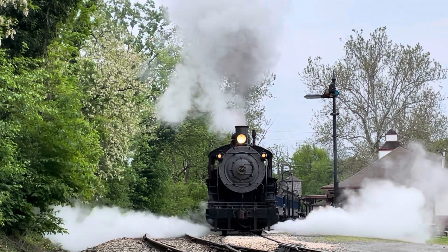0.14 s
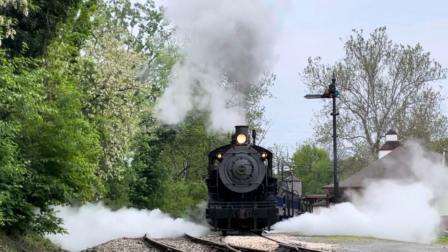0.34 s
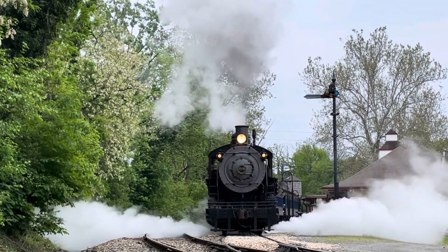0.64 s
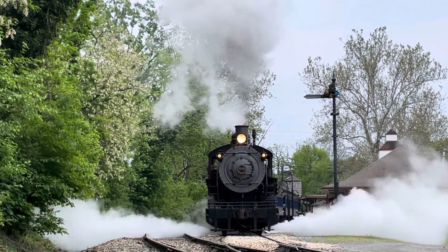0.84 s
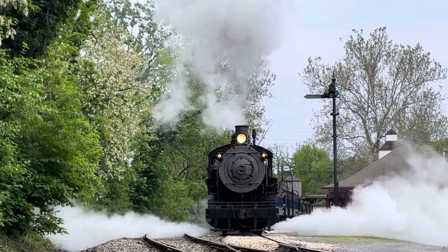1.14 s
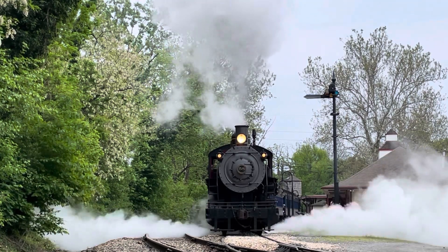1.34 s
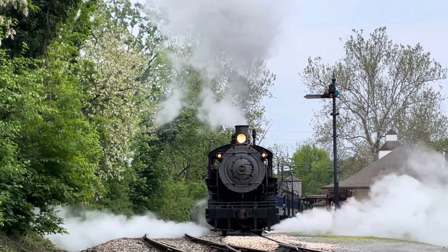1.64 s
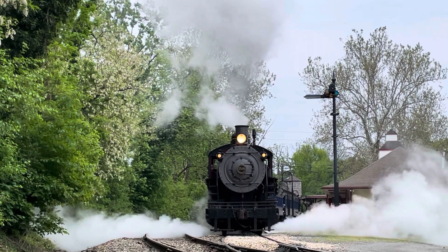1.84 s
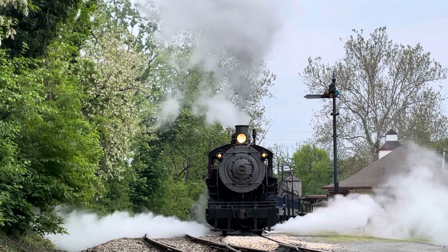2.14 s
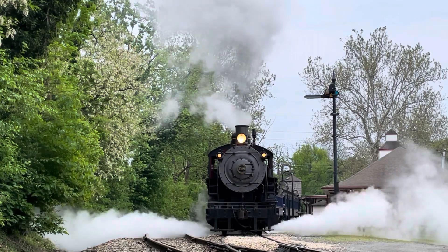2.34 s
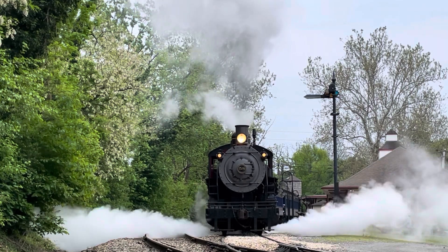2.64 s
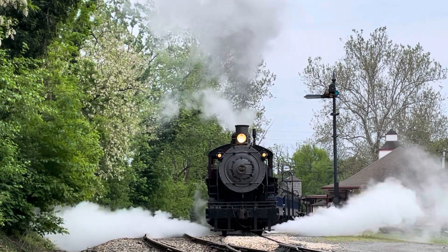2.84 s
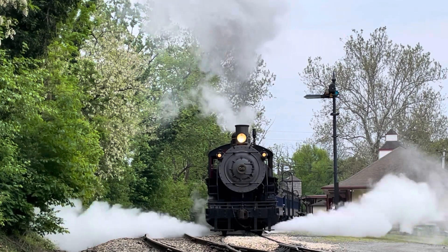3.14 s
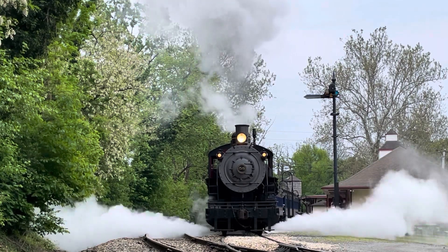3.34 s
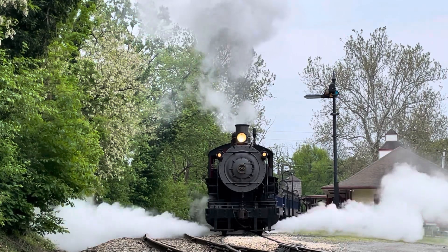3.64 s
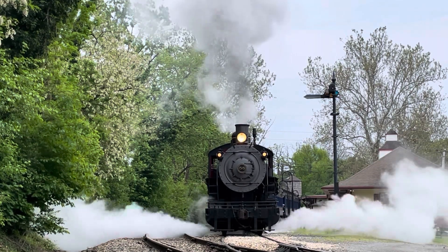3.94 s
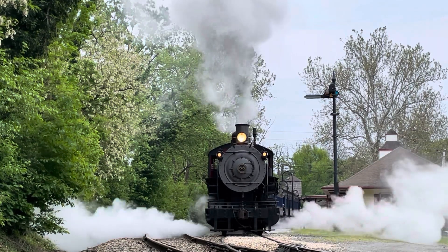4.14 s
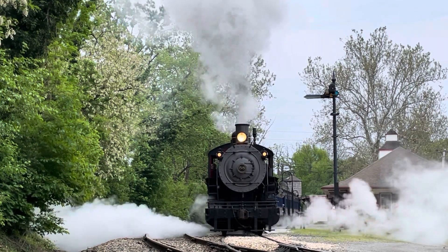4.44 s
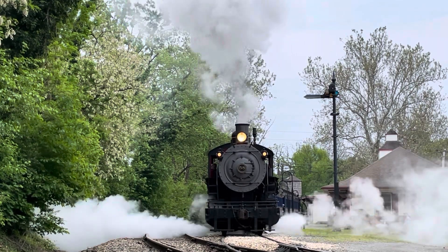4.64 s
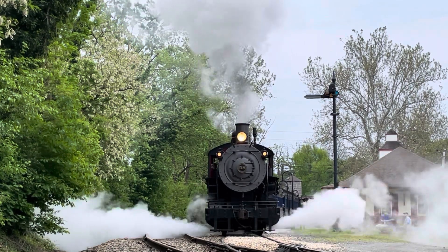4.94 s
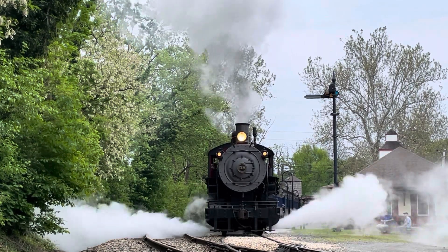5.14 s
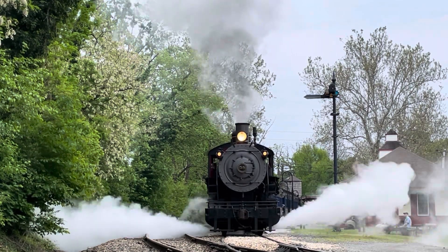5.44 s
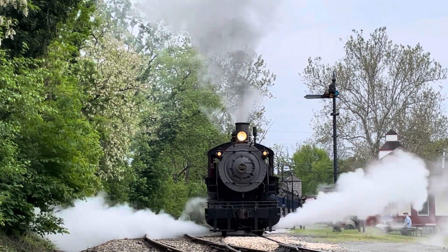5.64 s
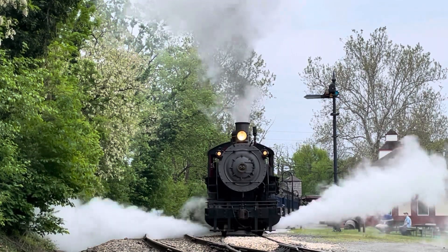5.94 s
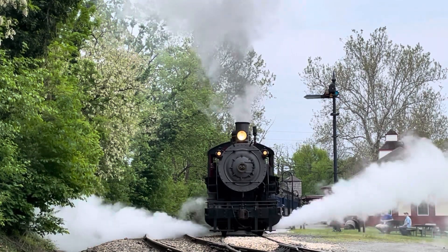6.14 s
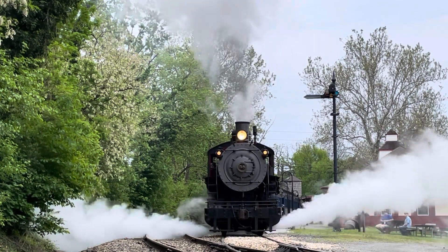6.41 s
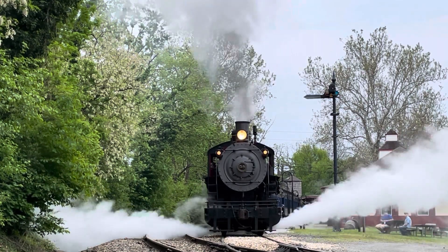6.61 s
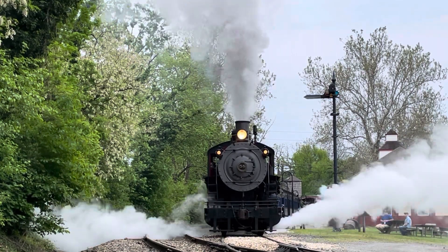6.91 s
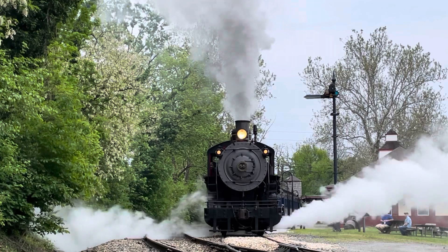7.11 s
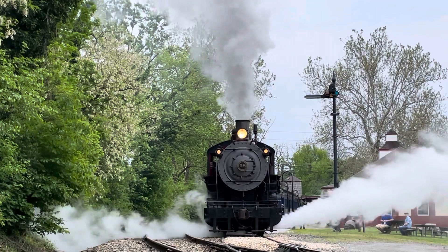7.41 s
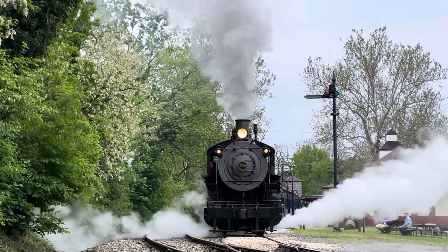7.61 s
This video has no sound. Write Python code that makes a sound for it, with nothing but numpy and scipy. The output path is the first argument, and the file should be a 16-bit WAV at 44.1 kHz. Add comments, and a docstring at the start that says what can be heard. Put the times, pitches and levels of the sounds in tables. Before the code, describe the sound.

A steam locomotive stands outdoors some way off, venting steam. A full hiss swells at once, sinks to a weaker breathy rush, then surges back louder and holds for several seconds before easing into a thinner, sharper spray. Beneath it lie a dull low rush and an uneven stack rumble, with barely noticeable wavering tones and a late low hum. Close stereo microphone pair, open air, no obvious echo.

```python
"""Steam hisses in swelling jets from the cylinder cocks of a locomotive standing some way off; under it the
draught rumbles in the stack, a low hum joins later and a few faint tones waver.
The jets are noise coloured by a pressure curve and by random eddies, the rumble and a dull low rush of
steam are steady noise with moving levels, and the tones are noise through narrow resonances.
The phase between left and right turns with frequency, as in a close pair, then in half-turn steps."""
import sys
import numpy as np
from scipy import signal
from scipy.fft import rfft, irfft, next_fast_len
from scipy.io import wavfile
from scipy.ndimage import uniform_filter1d

SR = 44100
rng = np.random.default_rng(int(sys.argv[2]) if len(sys.argv) > 2 else 0)


def transcribe(signal):
    """Save signal, clipped to [-1, 1], as a 16-bit WAV file at the path in sys.argv[1]."""
    frames = np.atleast_2d(signal).T
    limited = np.clip(frames, -1, 1)
    pcm = np.round(limited * 32767).astype(np.int16)
    wavfile.write(sys.argv[1], SR, pcm)


N = 342657
FRAME, HOP = 2048, 256   # short-time spectrum, samples

# Corners in Hz between the roar, throat, hiss and sizzle bands of the jets.
ROAR_HZ, THROAT_HZ, SIZZLE_HZ = 1770, 2760, 7160
# Share of the pressure swing that each band follows; the hiss between throat and sizzle follows it all.
ROAR_FOLLOWS, THROAT_FOLLOWS, SIZZLE_FOLLOWS = 0.45, 0.5, 1.28
# The resonances flatten as the jets thin, down to the share left.
PEAKS_FADE_FROM_S, PEAKS_FADE_S, PEAKS_LEFT = 4.2, 1.0, 0.3
# Spectral density of the steam noise. Each row: frequency in Hz, relative density in dB per Hz.
STEAM_SPECTRUM = [(700, -37), (900, -13.5), (1150, -10.5), (1350, -4), (2000, -3.5), (3000, -1), (4500, -1),
                  (5400, 0), (7000, -1.5), (9300, -4.5), (11500, -12.5), (13800, -18.5), (15700, -16)]
# Resonances and a dip in the jets. Each row: centre in Hz, full width at 1/e of the dB value in Hz,
# height in dB before flattening.
JET_RESONANCES = [(1297, 55, 5), (1570, 120, -3), (1685, 70, 3), (1890, 80, 2), (5215, 300, 2)]
# Change of colour as the jets thin and brighten. Each row: time in seconds, then roar, throat and
# sizzle offsets in dB.
JET_BRIGHTENING = [(0, 2, 2, -1), (.4, 1.5, 2, -2), (1.0, 2, 2.5, -2.5), (2.3, 1, 1, -1.5),
                   (3.3, -0.1, 2.6, -1.5), (4.0, -2, 1, 0), (5.0, -1.5, -0.5, -2.5), (6.2, -1.5, -1, 4),
                   (7.0, -7, -4, 4), (7.77, -7, -9.5, 0.5)]


def jets():
    """Turbulent jet noise: pressure sets level and colour, and eddies modulate the spectrum at random."""
    def gain_db(hz, s):
        mean_db, swing_db = pressure_swing_db(s)
        roar_db, throat_db, sizzle_db = columns(JET_BRIGHTENING, s)
        roar = 1 - above(hz, ROAR_HZ, 6.2)
        throat = 1 - above(hz, THROAT_HZ, 3.9) - roar
        sizzle = above(hz, SIZZLE_HZ, 4.1)
        # each band departs from the full swing by its own share
        colour_db = roar * (roar_db + (ROAR_FOLLOWS - 1) * swing_db)
        colour_db = colour_db + throat * (throat_db + (THROAT_FOLLOWS - 1) * swing_db)
        colour_db = colour_db + sizzle * (sizzle_db + (SIZZLE_FOLLOWS - 1) * swing_db)

        peaks_db = sum(db * np.exp(-(2 * (hz - centre) / width) ** 2)
                       for centre, width, db in JET_RESONANCES)
        fade_times = [PEAKS_FADE_FROM_S, PEAKS_FADE_FROM_S + PEAKS_FADE_S]
        peaks_db = peaks_db * np.interp(s, fade_times, [1, PEAKS_LEFT])

        shape = (len(hz), len(s))
        sputter = eddies((1, len(s)), frames=3, bins=1)    # the whole jet at once
        surges = eddies(shape, frames=24, bins=40)         # slow swells, band by band
        gusts = eddies(shape, frames=3, bins=70)           # quick, in broad bands
        unevenness = eddies(shape, frames=12, bins=2)      # brief narrow-band unevenness of the hiss
        # weights are rms depths in dB; the gusts reach only the treble
        flutter_db = 0.15 * sputter + 0.38 * surges + 1.0 * sizzle * gusts + 2.59 * unevenness

        steam_db = at_hz(STEAM_SPECTRUM, hz)
        level_db = mean_db + swing_db - hiss_band_db(hz, steam_db)
        return steam_db + peaks_db + level_db + colour_db + flutter_db
    return shaped_noise(gain_db)


# Steam pressure, as the level of the hiss band. Each row: time in seconds, level in dB.
STEAM_PRESSURE = [(0, -31), (.2, -24), (.33, -23), (.45, -23.5), (.78, -30.5), (1.06, -30.5), (1.35, -34.5),
                  (1.7, -31.5), (2.0, -28.5), (2.09, -29.5), (2.2, -24), (2.38, -21.5), (2.46, -23),
                  (2.75, -22), (2.85, -23.5), (3.14, -22), (3.5, -23.5), (3.76, -25), (4.3, -24),
                  (4.67, -25), (4.8, -22), (5.3, -24.5), (5.39, -23), (5.84, -22.5), (6.05, -24),
                  (6.4, -28), (6.66, -26.5), (7.42, -26.5), (7.77, -27.5)]


def pressure_swing_db(times):
    """Pressure modulation: the mean hiss level, and the swing about it."""
    hiss_db, = columns(STEAM_PRESSURE, times)
    return hiss_db.mean(), hiss_db - hiss_db.mean()


def hiss_band_db(hz, colour_db):
    """Band level by power summation: what unit noise of this colour has in the hiss band."""
    in_band = (hz > THROAT_HZ) * (hz < SIZZLE_HZ)
    return 10 * np.log10(np.mean(from_db(2 * colour_db) * in_band))


# Spectra of the draught's rumble and the steam's dull low rush. Each row: frequency in Hz, relative
# density in dB per Hz.
RUMBLE_SPECTRUM = [(12, -45), (20, -27), (42, -8), (65, 0.5), (140, -8.5), (160, -10), (210, -42),
                   (350, -120)]
LOW_RUSH_SPECTRUM = [(80, -27), (130, -7.5), (185, -3.5), (255, -3), (360, -8.5), (500, -6), (740, -3),
                     (950, -4.5), (1300, -54)]
# Their levels; the rumble's level wanders unevenly. Each row: time in seconds, level in dB.
RUMBLE_LEVEL = [(0.0, -54), (0.21, -51.5), (1.77, -52), (1.82, -48.5), (2.08, -55), (2.12, -48.5),
                (3.29, -53.5), (3.35, -43), (3.48, -53.5), (4.05, -44), (4.2, -54), (4.67, -55),
                (4.7, -48.5), (5.0, -55), (6.49, -58.5), (6.79, -50.5), (6.9, -59), (7.77, -55)]
LOW_RUSH_LEVEL = [(0.0, -52), (0.3, -45), (1.19, -52.5), (2.6, -45), (3.55, -49.5), (3.98, -48), (4.0, -50),
                  (5.93, -48), (6.28, -51), (7.77, -50)]


def rumble_and_low_rush():
    """Flow noise with moving levels: the draught rumbling in the stack and a dull low rush of the steam."""
    s = np.arange(N) / SR
    rumble_db, = columns(RUMBLE_LEVEL, s)
    low_rush_db, = columns(LOW_RUSH_LEVEL, s)
    rumble = from_db(rumble_db) * coloured(RUMBLE_SPECTRUM)
    low_rush = from_db(low_rush_db) * coloured(LOW_RUSH_SPECTRUM)
    return rumble + low_rush


HOLD_FADE_S = 0.053   # each fade is centred on the start or end of a hold
# Faint tones and the late hum. Each row: start in seconds, length in seconds, frequency in Hz,
# resonance width in Hz, level in dB.
HELD_TONES = [(.2, 2.5, 744, 10, -60), (2.7, 1.4, 738, 8, -56.5), (.97, .3, 938, 3, -52),
              (1.6, .3, 938, 3, -57), (1.97, .3, 940, 3, -52), (3.68, .14, 938, 3, -52),
              (1.0, .25, 4060, 12, -45), (4.68, .6, 192, 22, -58), (5.42, 1.1, 184, 14, -55),
              (6.7, 1.07, 192, 20, -57.5)]


def tones():
    """Narrow-band noise: faint wavering tones, each faded in, held and faded out."""
    s, out = np.arange(N) / SR, 0
    for start, length, hz, width_hz, db in HELD_TONES:
        to_nearest_end = np.minimum(s - start, start + length - s)
        held = np.clip(to_nearest_end / HOLD_FADE_S + 0.5, 0, 1)
        tone = np.array([rms_one(held * field) for field in resonance(hz, width_hz)])
        # the level holds while the tone sounds, so its share of the whole time is restored
        out = out + from_db(db) * np.sqrt(np.mean(held ** 2)) * tone
    return out


def resonance(hz, width_hz):
    """Resonant filtering: noise twice through a two-pole resonator gives a wavering tone of unit rms."""
    radius = np.exp(-np.pi * width_hz / SR)
    poles = [1, -2 * radius * np.cos(2 * np.pi * hz / SR), radius * radius]
    x = rng.standard_normal((2, N + SR))   # a second extra to settle
    for _ in range(2):
        x = signal.lfilter([1, 0, -1], poles, x)
    return rms_one(x[:, SR:])


RIGHT_BASS_DB, BASS_HZ = 0.35, 2010   # below this frequency the right is this much louder


def stereo_pair(fields):
    """Partial coherence: a shared and an unshared field reach left and right, which differ in phase."""
    size = next_fast_len(N + FRAME)
    hz = np.arange(size // 2 + 1) * SR / size
    points, lead, alike = stereo_phase()
    lead = np.interp(hz, points, lead)
    alike = np.clip(np.interp(hz, points, alike), 0, 1)
    shared, unshared = rfft(fields, size) * np.sqrt([(1 + alike) / 2, (1 - alike) / 2])
    # half the phase and level difference goes to each side
    turn = np.exp(0.5j * lead) * from_db(-RIGHT_BASS_DB / 2 * (hz < BASS_HZ))
    left, right = (shared + unshared) * turn, (shared - unshared) / turn
    return irfft([left, right], size)[:, :N]


# Just outside a level stretch: distance in Hz, radians turned, likeness.
EDGE_HZ, EDGE_TURN, EDGE_ALIKE = 110, 0.13, 0.93
SLOW_SHARE = 0.27   # the phase turns slowly for this share of the gap at either end
# The pair below the first level stretch. Each row: frequency in Hz, lead of the left in radians,
# likeness from 0 to 1.
LOW_PHASE = [(150, 0, .975), (400, 0, .88), (1200, .2, .89), (1550, 1.9, .85), (1980, .8, .62),
             (2300, 1.0, .78), (2850, .2, .93), (3050, 0, .99), (4200, 0, .99), (4300, 0, 1), (5150, 0, 1),
             (5250, 0, .98), (5600, .1, .93), (6100, 1.45, .79), (7000, .8, .8), (8150, 3.0, .9)]
# Bands where the stereo phase stays level, at half-turn steps. Each row: lower edge in Hz, upper edge
# in Hz, likeness in the band, likeness in the gap above, radians turned in the slow part of the gap.
# The last row only ends the gap before it.
PHASE_STEPS = [(8280, 8850, 1, .72, 1.05), (10380, 11000, .999, .64, .4), (12370, 13120, 1, .58, .4),
               (14550, 15200, .998, .64, .4), (16600, 17300, 1, .6, .4)]


def stereo_phase():
    """Phase and coherence over frequency: each level stretch holds, then turns to the next."""
    rows = list(LOW_PHASE)
    for k, (low, high, tight, loose, turn) in enumerate(PHASE_STEPS[:-1]):
        after = PHASE_STEPS[k + 1][0]
        level, next_level = (k + 1) * np.pi, (k + 2) * np.pi
        slow_hz = SLOW_SHARE * (after - high)
        rows += [(low, level, tight), (high, level, tight),
                 (high + EDGE_HZ, level + EDGE_TURN, EDGE_ALIKE),
                 (high + slow_hz, level + turn, loose),
                 (after - slow_hz, next_level - turn, loose),
                 (after - EDGE_HZ, next_level - EDGE_TURN, EDGE_ALIKE)]
    return np.transpose(rows)


def shaped_noise(gain_db):
    """Time-varying filtering: two unrelated noises shaped over frequency and time by gain_db(hz, s)."""
    white = rng.standard_normal((2, N))
    hz, s, frames = signal.stft(white, SR, nperseg=FRAME, noverlap=FRAME - HOP)
    gain = from_db(gain_db(hz[:, None], s))
    return signal.istft(frames * gain, SR, nperseg=FRAME, noverlap=FRAME - HOP)[1][:, :N]


def coloured(spectrum):
    """Spectral shaping: two unrelated steady noises with one spectrum and unit rms."""
    white = rfft(rng.standard_normal((2, N)))
    hz = np.arange(N // 2 + 1) * SR / N
    return rms_one(irfft(white * from_db(at_hz(spectrum, hz)), N))


def eddies(shape, frames, bins):
    """Turbulence correlation: a random field smoothed twice over time frames and frequency bins, unit rms."""
    field = rng.standard_normal(shape)
    for _ in range(2):
        field = uniform_filter1d(field, size=frames, axis=1)
        field = uniform_filter1d(field, size=bins, axis=0)
    return rms_one(field)


def above(hz, corner_hz, steepness):
    """Crossover weighting: a soft step from 0 below the corner to 1 above it."""
    return 1 / (1 + (corner_hz / (hz + 1)) ** steepness)


def at_hz(points, hz):
    """Spectral interpolation: dB values read on a log-frequency axis."""
    point_hz, db = np.transpose(points)
    return np.interp(np.log(hz + 1), np.log(point_hz), db)


def columns(rows, times):
    """Linear interpolation: table columns joined by straight lines in time."""
    s, *cols = np.transpose(rows)
    return [np.interp(times, s, col) for col in cols]


def from_db(db):
    """Logarithmic level: decibels to amplitude gain."""
    return 10 ** (np.asarray(db) / 20)


def rms_one(x):
    """Power normalisation: scale to unit rms."""
    return x / np.sqrt(np.mean(x ** 2) + 1e-20)


def scene():
    """Superposition: all sources add and are heard in stereo."""
    return stereo_pair(jets() + rumble_and_low_rush() + tones())


def record(dry):
    """Band limiting: a steep elliptic low-pass cuts the top above 15740 Hz."""
    # order 16, 0.3 dB ripple, 75 dB rejection
    low_pass = signal.ellip(16, 0.3, 75, 15740, fs=SR, output="sos")
    return signal.sosfilt(low_pass, dry)


dry = scene()
out = record(dry)
transcribe(out)
```